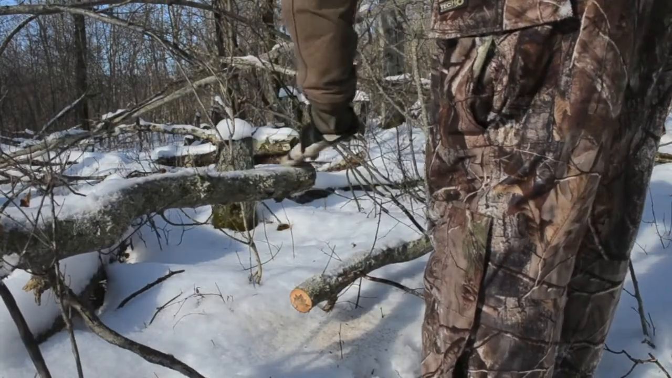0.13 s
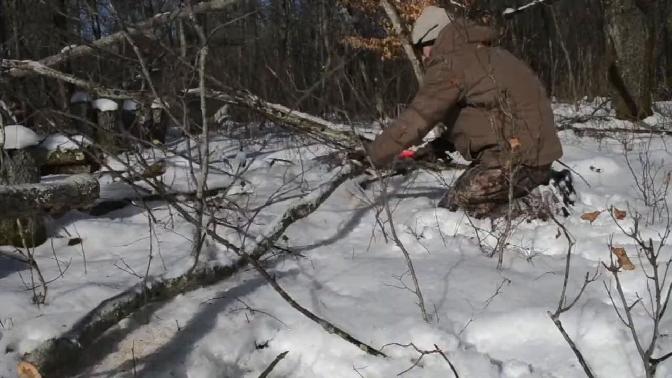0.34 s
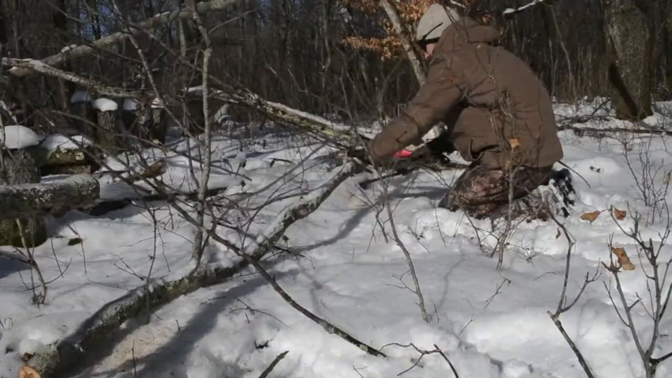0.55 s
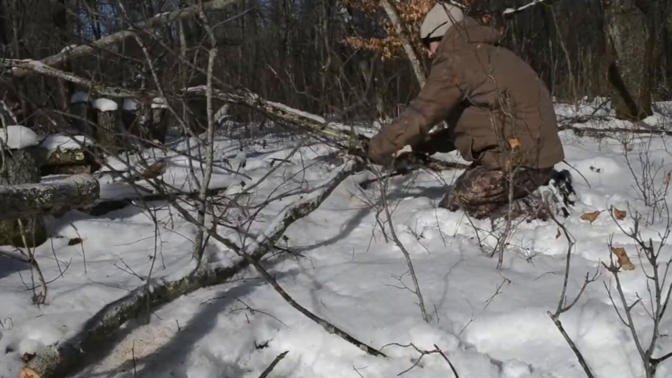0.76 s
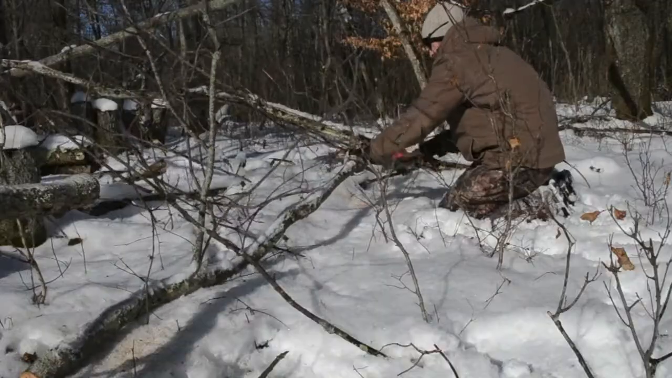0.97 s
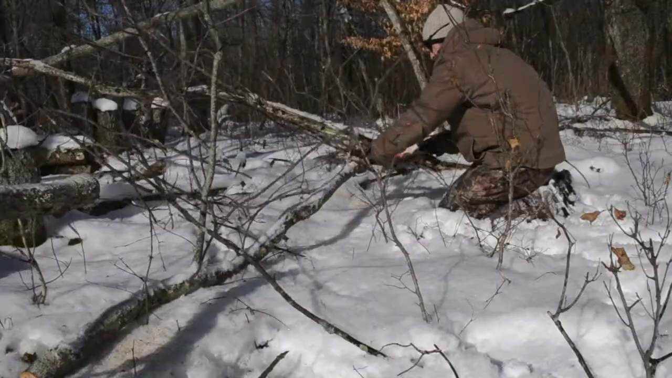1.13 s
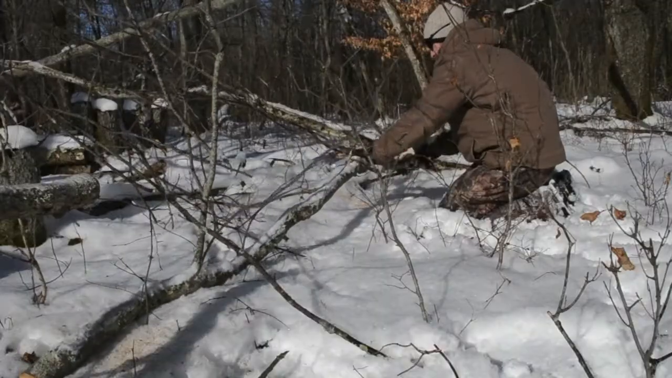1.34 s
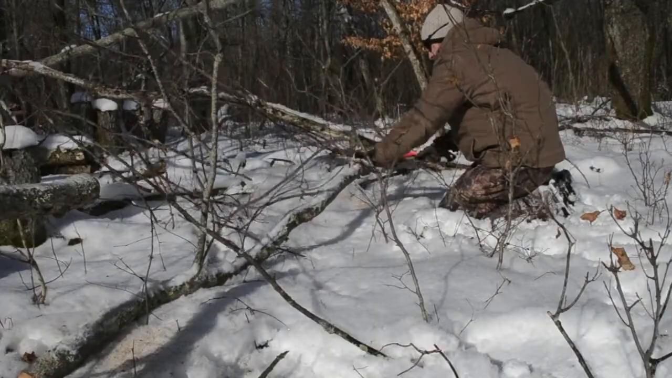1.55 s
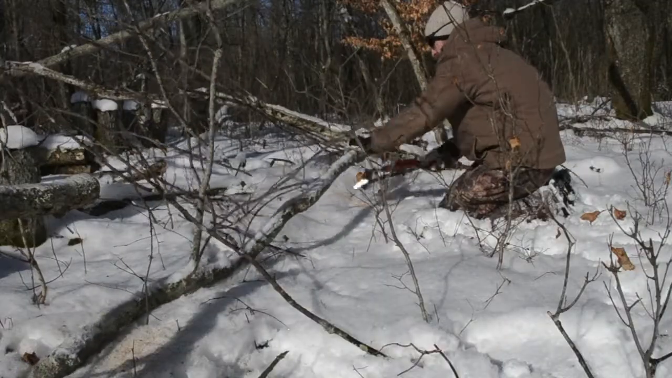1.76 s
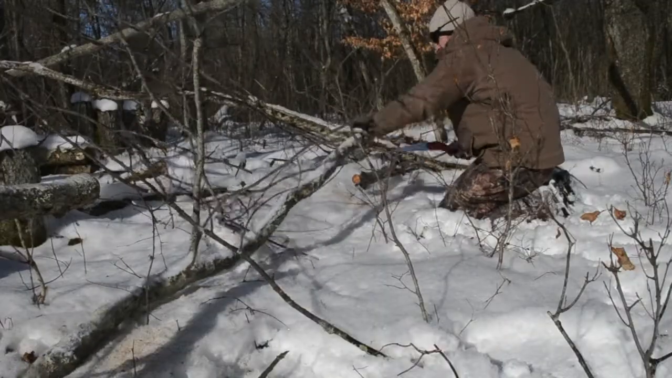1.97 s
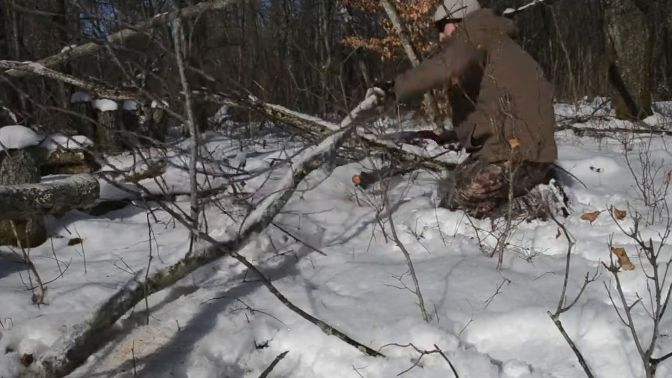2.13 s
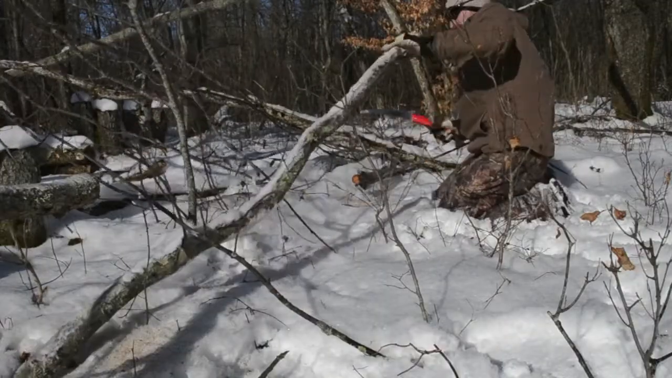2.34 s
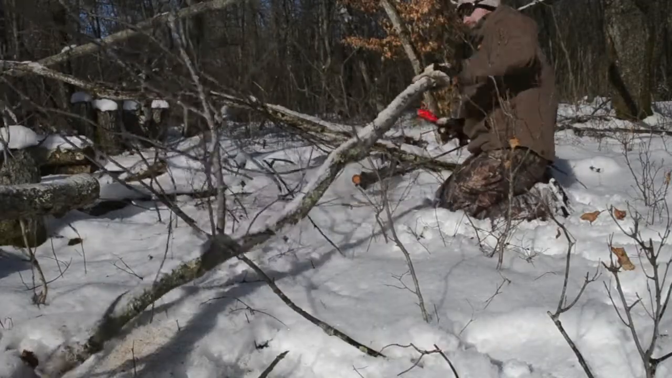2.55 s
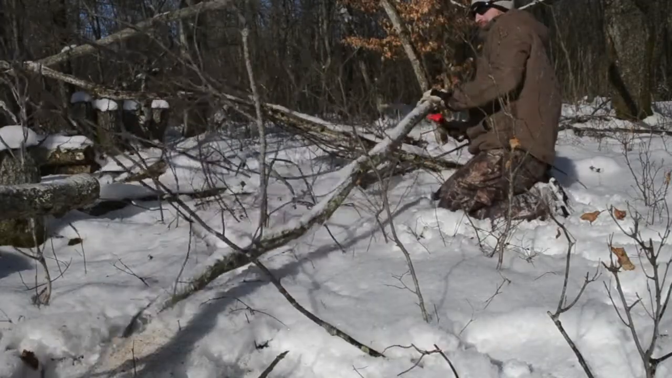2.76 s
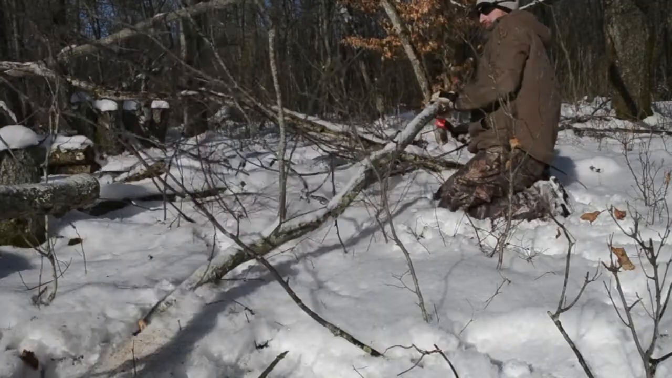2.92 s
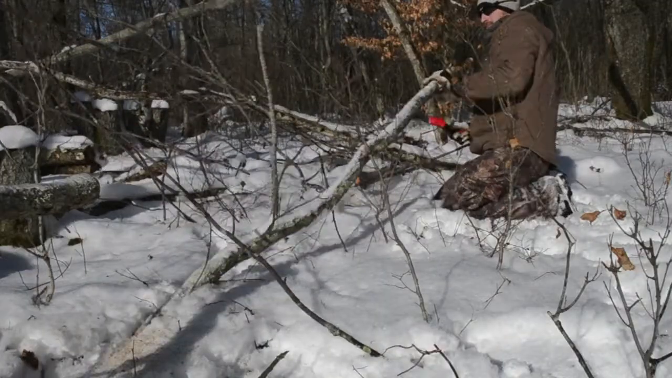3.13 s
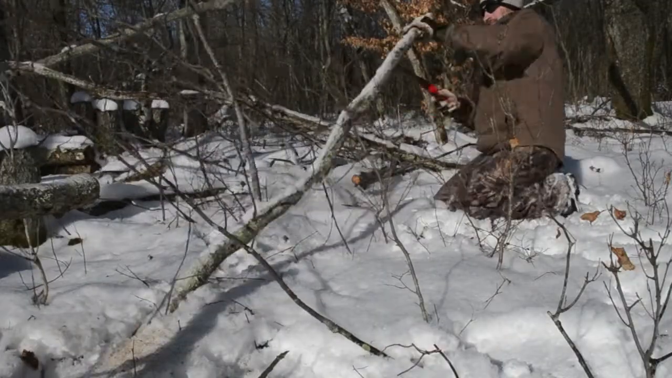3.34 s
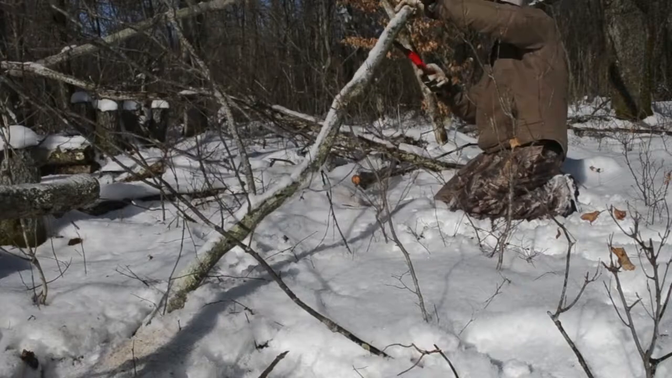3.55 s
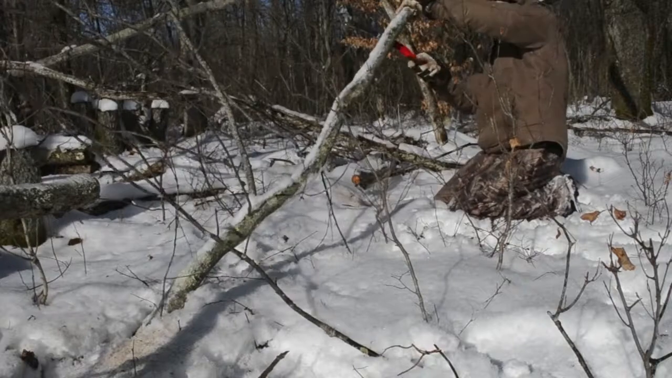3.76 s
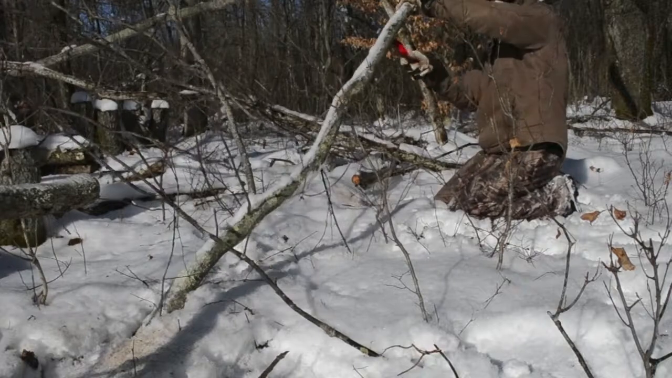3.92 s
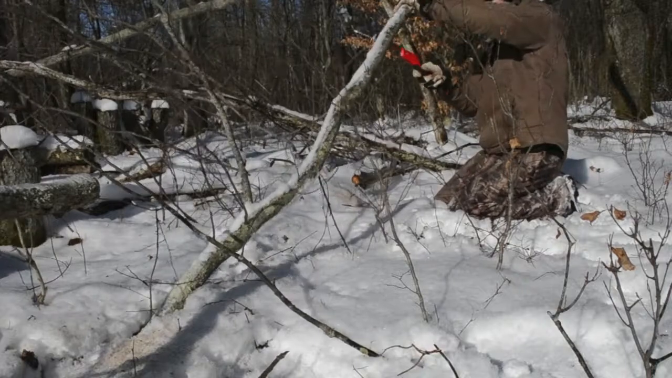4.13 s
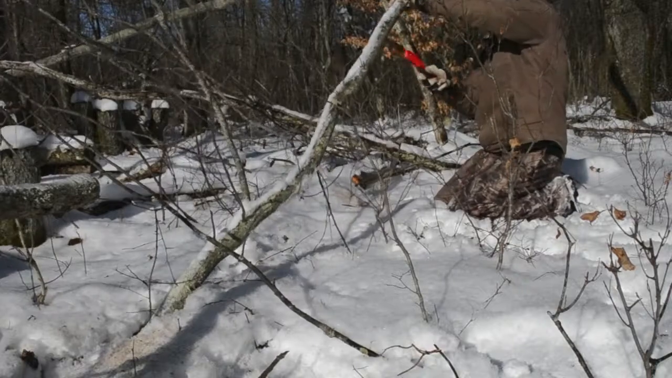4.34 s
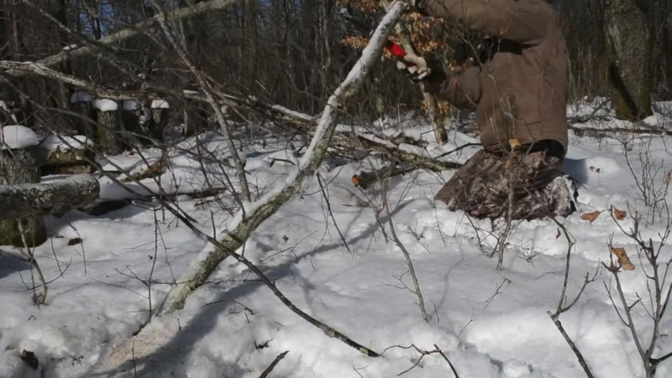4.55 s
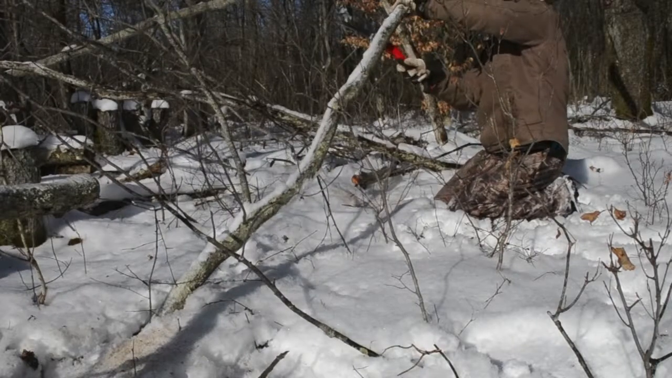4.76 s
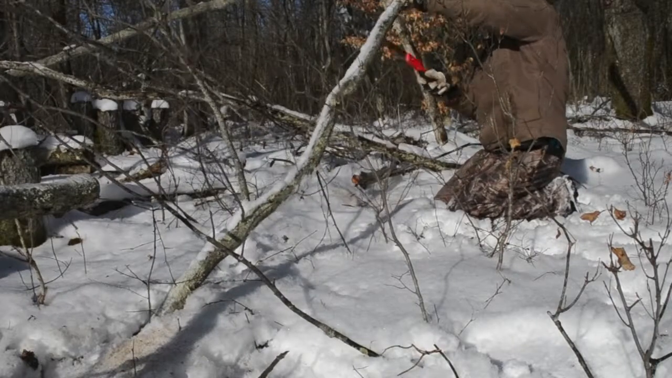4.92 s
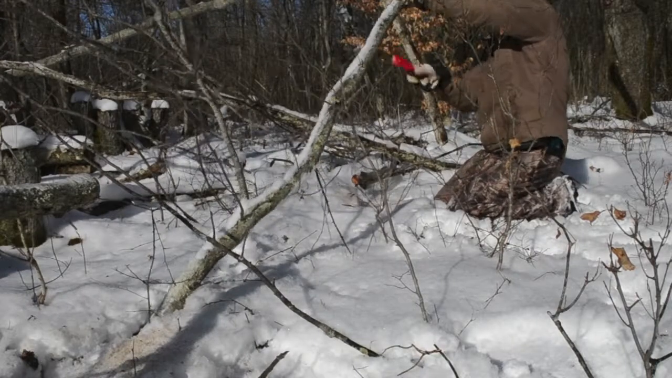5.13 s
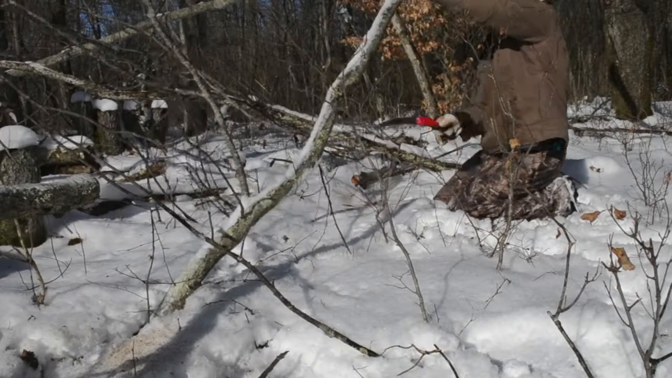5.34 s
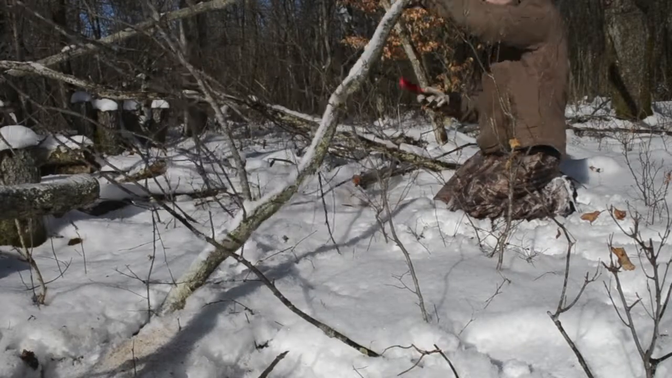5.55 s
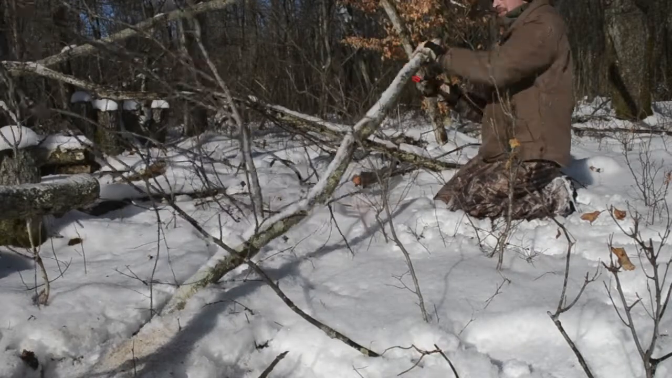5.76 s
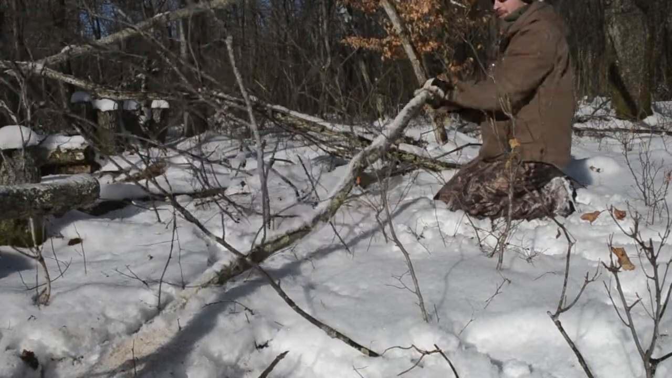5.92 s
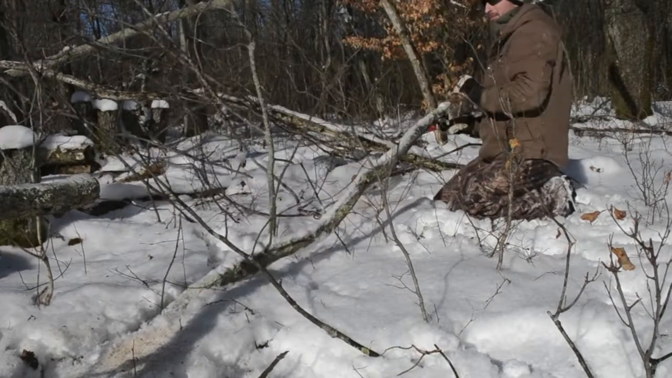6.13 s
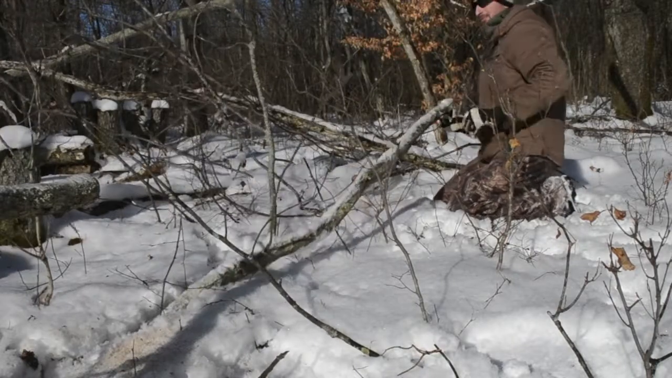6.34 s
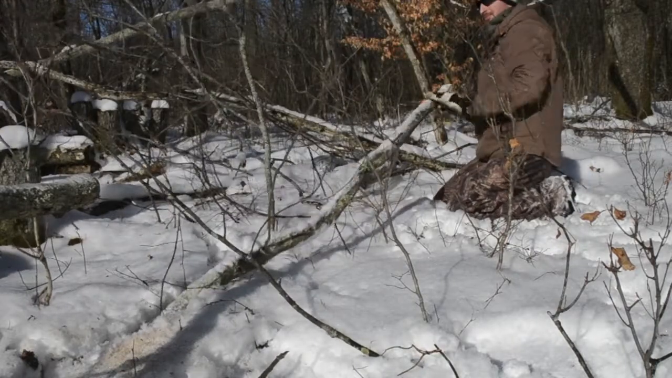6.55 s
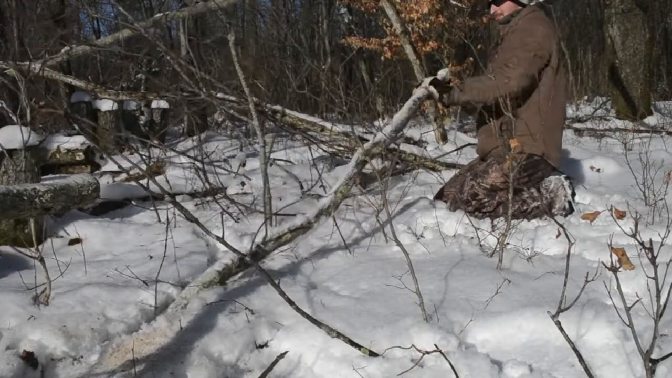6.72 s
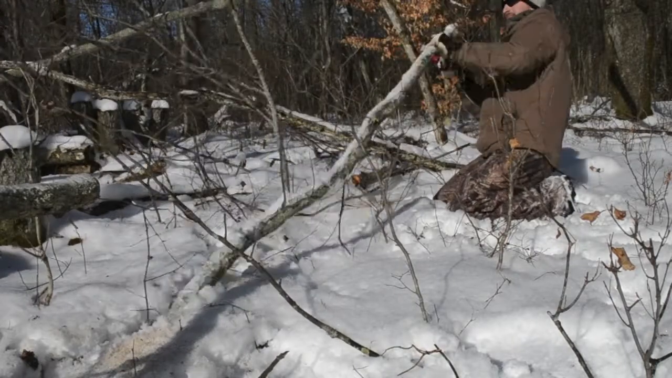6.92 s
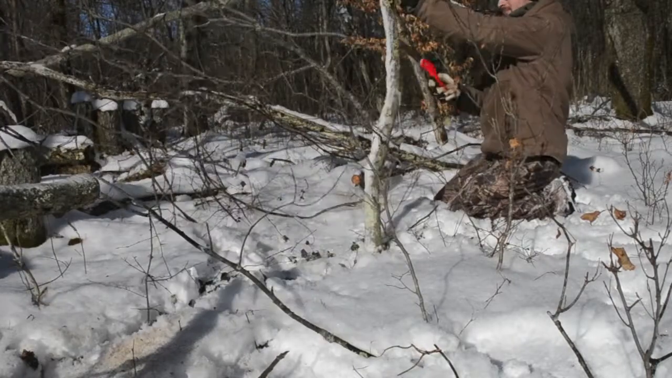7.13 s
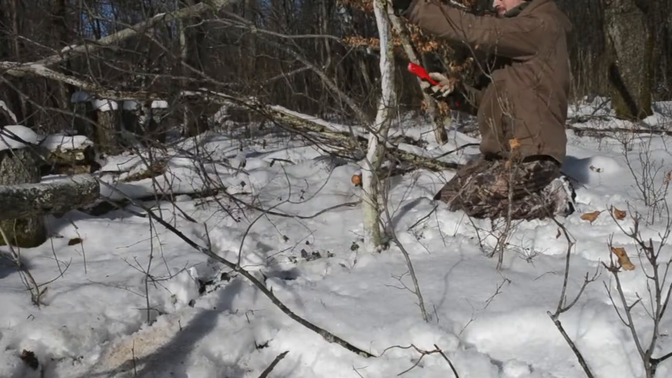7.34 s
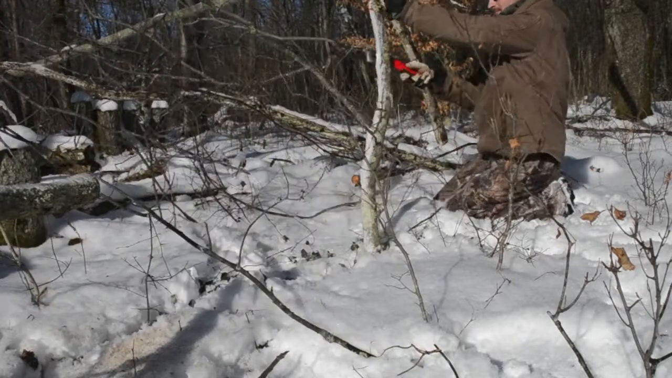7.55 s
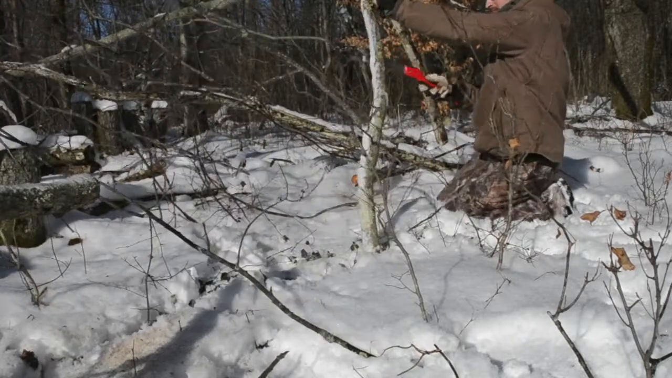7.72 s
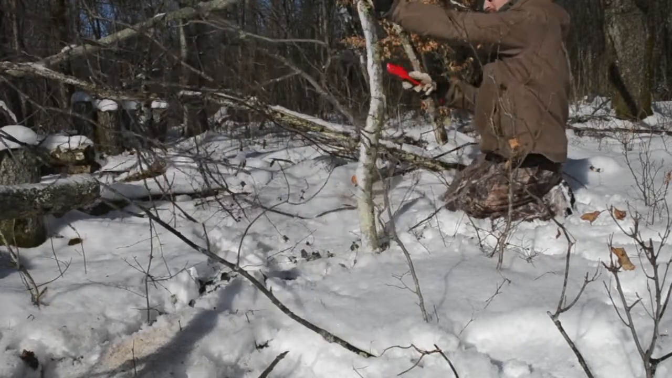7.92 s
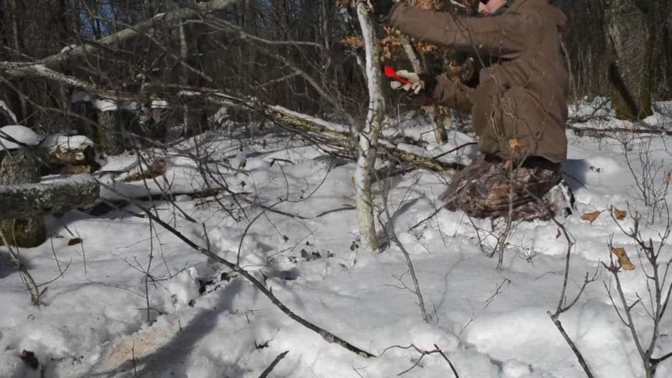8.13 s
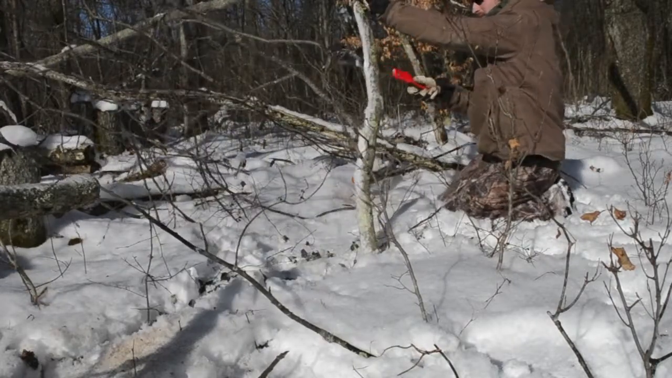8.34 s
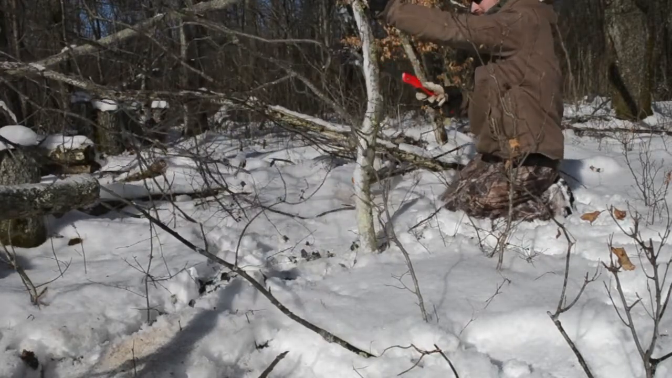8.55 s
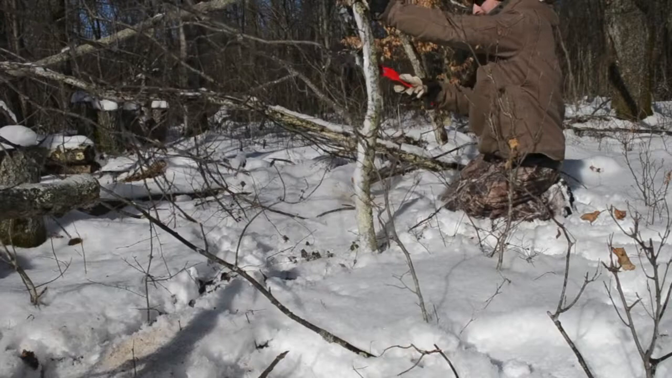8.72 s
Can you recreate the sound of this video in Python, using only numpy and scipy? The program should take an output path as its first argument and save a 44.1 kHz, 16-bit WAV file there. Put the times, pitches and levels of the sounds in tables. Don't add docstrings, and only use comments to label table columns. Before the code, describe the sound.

Fast dry sawing strokes in quiet winter woods, broken by wood cracking and a branch dragged hissing and crunching through snow and twigs.

```python
import sys
import numpy as np
from scipy import signal
from scipy.io import wavfile
from scipy.ndimage import uniform_filter1d

SR = 44100
rng = np.random.default_rng(int(sys.argv[2]) if len(sys.argv) > 2 else 0)


def file_out(sig):
    cols = np.atleast_2d(sig).T
    lim = np.clip(cols, -1, 1)
    pcm = np.round(lim * 32767).astype(np.int16)
    wavfile.write(sys.argv[1], SR, pcm)


def nominal_scale(level):
    x = np.asarray(level, float) / 20
    return 10 ** x


N = 391588
TIME_S = np.arange(N) / SR
COARSE_S = TIME_S[::64]

# (frequency [Hz], density [dB per Hz])
AIR_SPECTRUM = [(15, -55), (25, -19.5), (327, -1), (391, -2.5), (619, -1), (721, 4), (1200, -8.5),
                (2640, -10), (3240, -10), (6120, -35), (7900, -48), (9200, -31), (11000, -42), (14300, -66),
                (22000, -120)]
# (time [s], level [dB])
SNOW_PRESSES = [(0.32, -71), (0.57, -73), (0.731, -63), (1.02, -58.5), (1.39, -64), (1.659, -59),
                (2.65, -67), (3.001, -60), (3.224, -61), (3.56, -72), (4.199, -66), (4.771, -61),
                (5.07, -64), (5.3, -68), (7.05, -75), (7.621, -62)]
# (frequency [Hz], density [dB per Hz])
PRESS_SPECTRUM = [(40, -7), (90, -11.5), (160, -1), (260, -5.5), (400, -65)]
# (peak time [s], rise [s], fall [s], crunch level [dB], hiss over crunch [dB])
SHOVES = [(0.1, 0.22, 0.28, -55, 7.5), (0.35, 0.078, 0.64, -57, -1), (1.7, 0.41, 0.18, -58.5, 2),
          (2.25, 0.38, 0.31, -55, 0), (2.48, 0.16, 1.4, -61, -7), (2.8, 0.59, 0.2, -49, 4.5),
          (2.96, 0.24, 0.044, -58.5, -7), (3.12, 0.023, 0.7, -57, 1.5), (3.4, 0.14, 0.32, -60, 9),
          (3.56, 0.27, 0.043, -58, -17), (3.87, 0.082, 0.047, -63, -1), (4.6, 1.3, 2.1, -57.5, -4),
          (5.22, 0.52, 0.52, -65.5, 10), (5.655, 0.08, 0.28, -62, 5), (5.92, 0.2, 0.15, -58.5, 0),
          (6.02, 0.11, 0.31, -63.5, 6), (6.63, 0.1, 0.095, -57.5, 3.5), (6.94, 0.19, 0.2, -49, -3),
          (7.08, 0.28, 0.11, -54.5, 7.5), (7.23, 0.1, 1.3, -70, 5), (7.46, 0.094, 0.33, -59.5, -6),
          (7.7, 0.062, 1.5, -58.5, 2)]
# (frequency [Hz], density [dB per Hz])
CRUNCH_SPECTRUM = [(88, -27), (150, -14.5), (408, -8.5), (448, -4), (568, 0), (1630, 3), (3500, -6),
                   (4550, -20.5), (7700, -120)]
# (frequency [Hz], density [dB per Hz])
HISS_SPECTRUM = [(1290, -18.5), (2200, -8), (6330, -6), (7860, -9), (9170, -4.5), (10100, -12.5),
                 (11000, -28.5), (14300, -69), (22000, -120)]
# (time [s], peak [dB], centre [Hz])
TWIG_SNAPS = [(1.729, -40, 5470), (1.8017, -42, 4900), (1.8406, -43, 5000), (1.8735, -52, 4940),
              (1.9314, -45, 7500), (1.952, -42.5, 8800), (1.9867, -50, 5110), (2.0032, -45, 4700),
              (2.039, -38.5, 6600), (2.1084, -55, 5130), (2.1093, -36, 8950), (2.204, -49, 4160),
              (2.2214, -28, 5030), (2.2571, -39.5, 3510), (2.3355, -39.5, 4680), (2.3826, -33, 6600),
              (2.4, -30, 7940), (2.4407, -49, 7140), (2.483, -46, 5560), (2.494, -39, 6500),
              (2.5067, -30.5, 3770), (2.707, -34.5, 8200), (2.7464, -36, 4510), (2.7898, -41, 5610),
              (2.819, -33, 6240), (2.9233, -39, 3240), (2.9515, -45, 7400), (2.975, -31.5, 6300),
              (2.9949, -41, 4330), (3.0247, -39, 9030), (3.059, -43, 4730), (3.1037, -40, 9450),
              (3.184, -40, 5400), (3.2863, -36, 3570), (3.3152, -44, 5170), (3.3382, -41, 5320),
              (3.3448, -35, 3830), (3.387, -34.5, 3400), (3.405, -32, 4610), (3.4344, -35, 7220),
              (3.4734, -34, 5810), (3.4748, -30.5, 4180), (3.5497, -38, 5050), (3.5706, -40, 3970),
              (3.628, -51, 5680), (3.6729, -38, 9140), (3.712, -44, 5860), (3.7256, -34.5, 7700),
              (3.767, -41.5, 4900), (3.7976, -54, 3160), (3.867, -47, 8100),
              (5.223, -41, 8860), (5.2417, -42, 4770), (5.269, -30, 6340), (5.3186, -51, 4300),
                   (5.33, -40, 3720), (5.3707, -37.5, 4730), (5.4426, -39, 7640), (5.489, -47, 3990),
                   (5.5027, -40, 5760), (5.5385, -48, 6560), (5.5553, -37.5, 7000), (5.6463, -44, 3000),
                   (5.6476, -36, 6620), (5.7221, -43, 4020), (5.7885, -40, 4000), (5.8254, -43, 7230),
                   (5.8257, -43, 4500), (5.8923, -33, 9100), (5.9396, -43, 5020), (6.0938, -45, 4240),
                   (6.1492, -45, 5250), (6.226, -41, 9400), (6.244, -42, 8400), (6.2629, -39.5, 4300),
                   (6.4231, -46.5, 8900), (6.448, -45, 9000), (6.5053, -45, 4860), (6.5468, -46, 4720),
                   (6.5813, -42, 3820),
              (6.8016, -45, 3030), (6.8351, -44, 4310), (7.1698, -52, 3670), (7.2018, -41, 8770),
                   (7.2636, -45.5, 4340), (7.2901, -53, 4850), (7.337, -44, 3860), (7.3504, -40.5, 5200),
                   (7.4053, -41.5, 7030), (7.4257, -37, 6700), (7.4537, -38, 5000)]
# (time [s], peak [dB], centre
# [Hz])
MORE_SNAPS = [(1.42, -45, 6480), (1.5244, -45, 3480), (1.5549, -41, 4520), (1.7064, -37, 5570),
              (1.8008, -42, 4900), (3.9601, -38, 5730), (4.1244, -42, 8770), (4.2743, -36.5, 5330),
              (4.586, -38, 3200), (7.7667, -34, 9370), (8.1876, -36, 8970)]
# (time [s], peak [dB], centre [Hz])
FIBRE_CATCHES = [(0.2833, -33, 4930), (0.2965, -44, 5640), (0.3132, -44, 3220), (0.5831, -21.5, 3480),
                 (0.7828, -36, 5400), (0.865, -25.5, 3470), (0.92, -38.5, 6700), (1.2025, -28, 3500),
                 (1.2288, -23.5, 3500), (1.2867, -38, 5500), (0.586, -32, 3340), (1.455, -36.5, 4950),
                 (1.6279, -33.5, 4740), (5.115, -39, 5800), (5.1756, -26, 6550), (7.62, -45, 6330),
                 (7.6444, -44, 8920), (7.906, -34, 8360), (7.914, -28.5, 5460), (8.069, -35, 8400),
                 (8.1998, -32, 8900), (8.3499, -49, 8860), (8.633, -34.5, 5500)]
# (time [s], peak [dB], splinter [Hz], stick [Hz], stick over splinter [dB])
CLEAN_BREAKS = [
    (1.671, -23, 3200, 1800, -6),
    (1.694, -15.5, 6000, 3000, -22),
    (3.9143, -23, 5600, 3600, -7),
    (4.2215, -32, 4500, 760, 2),
    (4.5155, -27, 4800, 2200, -4),
    (6.6771, -15, 4700, 1500, -9),
    (6.926, -22, 8500, 1600, -6),
]
# (time [s], peak [dB], main ring [Hz], treble over peak [dB])
WOOD_KNOCKS = [(0.31, -25, 930, -7), (0.382, -41, 920, -1), (0.5804, -18.5, 1020, -17),
               (0.784, -44.5, 1560, 9.5), (0.864, -22, 1260, -11), (1.202, -26, 830, -14),
               (1.228, -27, 880, -15), (1.666, -30, 2560, 4.5), (2.334, -51, 1720, -9),
               (2.506, -34.5, 1610, -1), (2.923, -41, 1810, 3), (3.724, -44, 774, -7),
               (3.797, -49, 1030, -19), (3.85, -39.5, 684, -31), (3.875, -43, 1570, 2),
               (4.447, -34.5, 1000, -21), (4.794, -33, 985, -19), (5.112, -36, 1380, -19),
               (5.162, -37, 1060, -20), (5.927, -41, 1060, -18), (6.464, -46, 1115, -21),
               (6.504, -34.5, 1290, -14), (6.6745, -30.5, 1820, 1), (6.91, -46, 846, 2),
               (6.924, -36, 1570, 8.5), (7.077, -39, 1700, -2), (7.426, -49.5, 966, 5)]
# (time [s], peak [dB], main ring [Hz], treble over peak [dB])
BARK_SCUFFS = [(.185, -40.5, 1700, 1), (1.395, -41.5, 537, -25), (1.655, -33, 450, -27),
               (1.675, -37, 1800, 4), (1.688, -39, 3280, 9), (1.696, -43.5, 2000, 9),
               (6.68, -42.5, 2000, -0.5), (2.249, -45, 1030, -12.5), (2.992, -43.5, 1950, -16),
               (5.291, -46, 870, -17), (5.635, -43, 1890, -18.5), (5.657, -44.5, 840, -20),
               (5.335, -52, 900, -20), (5.475, -55, 700, -20), (5.623, -47, 1020, -15),
               (5.645, -47, 1200, -10), (5.914, -47, 1400, -17), (5.985, -48, 1200, -20),
               (6.015, -49, 1100, -20), (6.563, -54, 1300, -12), (2.516, -38, 1610, -12),
               (6., -45, 650, -15), (6.525, -46, 1130, -20), (6.549, -52, 1160, -28)]
# (frequency [Hz], density [dB per Hz])
KNOCK_SPECTRUM = [(120, -76), (200, -12.5), (985, 4), (1720, 0.5), (2410, 6), (2900, -7), (3490, -2.5),
                  (6000, -20), (7800, -71), (13200, -120)]
# (time [s], low mode [dB], low mode [Hz], contact [s], upper modes [dB])
LIMB_BLOWS = [(0.5813, -24.5, 924, 0.007, -14), (.8636, -27.5, 965, .009, -22),
              (1.2017, -29, 880, 0.0053, -25.5), (1.228, -27.5, 863, 0.0077, -22.5),
              (1.394, -43.5, 548, .012, -58), (4.218, -34, 760, 0.006, -47), (4.442, -36.5, 950, .005, -50),
              (4.449, -31.5, 1000, 0.0075, -40), (4.513, -28.5, 770, 0.0053, -45),
              (5.289, -50, 890, 0.0083, -60), (5.657, -48, 826, 0.008, -61),
              (5.926, -44, 1190, 0.0043, -58), (6.6761, -28.5, 1125, 0.0032, -54)]
# (frequency [Hz], level [dB], t60 [s])
LIMB_MODES = [(1560, -6, 0.026), (1920, -1.5, 0.036), (2100, 3, 0.029), (2340, 4, 0.017), (3200, -5, 0.024),
              (3640, 4.5, 0.015), (4440, -22, 0.018), (4840, -8, .03), (6960, -17, .012)]
# (time [s], peak [dB], mode [Hz], t60 [s])
BLADE_PINGS = [
    (1.625, -43, 4920, 0.083),
    (1.748, -43, 4880, 0.16),
    (2.992, -47, 2030, 0.054),
    (5.177, -40, 6380, 0.11),
    (7.427, -46, 6300, 0.079),
    (7.455, -44, 4920, 0.075),
    (7.455, -53, 5650, 0.17),
    (7.815, -41, 4890, 0.095),
]
# (start [s], length [s], wood level [dB], fastest point [0-1 of stroke])
SAW_RUNS = [
    [(0.28, 0.052, -55, 0.4), (0.355, 0.12, -50, 0.68), (0.488, 0.24, -47, 0.25), (0.653, 0.095, -50, 0.73),
     (0.762, 0.18, -47.5, 0.36), (0.941, 0.14, -53.5, 0.45), (1.095, 0.24, -51.5, 0.37),
     (1.296, 0.11, -54, 0.58), (1.424, 0.13, -50.5, 0.64), (1.574, 0.067, -54, 0.72)],
    [(3.95, 0.18, -46, 0.52), (4.115, 0.13, -48.5, 0.64), (4.257, 0.15, -41.5, 0.59),
     (4.414, 0.11, -46, 0.7), (4.546, 0.14, -43.5, 0.62), (4.697, 0.11, -45.5, 0.77),
     (4.825, 0.14, -38.5, 0.66), (4.977, 0.12, -43.5, 0.66), (5.105, 0.028, -48, 0.75),
     (5.149, 0.0486, -50, 0.67)],
    [(7.62, 0.19, -48.5, 0.35), (7.786, 0.11, -51, .6), (7.901, 0.12, -45, 0.76), (8.05, 0.12, -50, 0.65),
     (8.18, 0.14, -45.5, .55), (8.335, 0.12, -48.5, .56), (8.462, 0.13, -47, .5), (8.605, 0.11, -48, 0.68),
     (8.732, 0.12, -46, 0.6)],
]
# (frequency [Hz], width [Hz], level [dB])
BRANCH_MODES = [
    [[(520, 100, -7), (930, 140, -5.5), (2080, 350, -8)], [(307, 99, 5.5), (460, 65, 4.5), (1060, 31, 2)]],
    [[(842, 21, -6), (1030, 40, -8), (1380, 69, 0.5), (2546, 47, 6)], [(1030, 57, 0), (2270, 49, -22),
     (2578, 59, -5)]],
    [[(450, 32, 1.5), (1060, 46, 7.5), (1850, 200, 3.5), (2380, 380, 4)], [(480, 180, -2), (965, 42, -2.5),
     (1810, 140, -1)]],
]
# (frequency [Hz], width [Hz], level [dB])
BLADE_MODES = [(3420, 260, 5), (4020, 62, 8), (4455, 46, 10.5), (5030, 89, 8), (5724, 38, 9.5),
               (6650, 190, 5), (8400, 740, 2)]
# (frequency [Hz], width [Hz], level [dB])
BLADE_OVERHANG = [
    (5000, 1700, 11),
    (9400, 1200, -13),
    (8660, 1200, 0),
]
# (pull [dB], push [dB])
BLADE_OVER_WOOD = [
    (-0.5, -1.5),
    (-1.2, -2),
    (3.6, 1.7),
]
# (frequency [Hz], density [dB per Hz])
TEAR_SPECTRUM = [(60, -31.5), (150, -29), (350, -12.5), (800, -3.5), (1350, -4), (2000, -7.5),
                 (3200, -14.5), (5000, -30)]
# (frequency [Hz], density [dB per Hz])
RASP_SPECTRUM = [(1200, -45), (2200, -16), (2800, -7), (4200, -8), (5100, -2), (7200, -4), (9300, 1),
                 (10100, -6), (11000, -24), (14000, -68)]
# (time [s], fade out [s], fade in [s])
SCENE_CHANGES = [
    (0.271, 0.055, 0.041),
    (7.149, 0.035, 0.069),
]
# (frequency [Hz], width [Hz], level [dB])
HOUSING_DIP = (7850, 260, -9)


def evened(x):
    return x / np.sqrt(np.mean(x ** 2) + 1e-20)


def peak_at(db, x):
    return nominal_scale(db) * x / abs(x).max()


def add(mix, start_s, sound):
    part = mix[round(start_s * SR):][:len(sound)]
    part += sound[:len(part)]


def colour(x, spectrum, peaks=(), lift_db=0.):
    hz = abs(np.fft.fftfreq(8192, 1 / SR))
    f, db = np.transpose(spectrum)
    power = nominal_scale(2 * np.interp(np.log(hz + 1), np.log(f), db, left=-60, right=-60))
    resonance = sum(nominal_scale(2 * (lift_db + d)) / (1 + (2 * (hz - c) / w) ** 2) for c, w, d in peaks)
    log_gain = np.log(power * (1 + resonance)) / 2
    taps = np.fft.ifft(np.exp(np.conj(signal.hilbert(log_gain)))).real[:4096]
    return signal.oaconvolve(x, taps / np.linalg.norm(taps))[:len(x)]


def grit(per_s, spread_db, puff_s, share):
    size = nominal_scale(spread_db * np.minimum(rng.exponential(1, N), 4))
    size = size * (rng.random(N) < per_s / SR)
    puffs = signal.lfilter([1], [1, -np.exp(-1 / (puff_s * SR))], size)
    return evened((1 - share + share * evened(puffs)) * rng.standard_normal(N))


def ring(hz, t60_s, size=5000):
    t = np.arange(size) / SR
    return np.sin(2 * np.pi * hz * t) * nominal_scale(-60 * t / t60_s)


def patchy(x, depth_db, bins, frames):
    z = signal.stft(x, nperseg=512, noverlap=384)[2]
    field = rng.standard_normal(z.shape[::-1]).T
    field = uniform_filter1d(field, bins, axis=0)
    field = evened(uniform_filter1d(field, frames, axis=1))
    return signal.istft(z * nominal_scale(depth_db * field), nperseg=512, noverlap=384)[1][:N]


def hump(peak_s, rise_s, fall_s, db):
    drop_db = -14
    away = np.maximum((peak_s - COARSE_S) / rise_s, (COARSE_S - peak_s) / fall_s)
    return nominal_scale(2 * (db + drop_db * away))


def stroke_arc(length_s, fastest):
    usual_s, usual_exponent, exponent_per_s = 0.13, 0.67, 31
    size = round(length_s * SR)
    u = np.arange(size) / size
    speed = np.sin(np.pi * u ** (np.log(.5) / np.log(np.clip(fastest, .1, .9))))
    return speed, max(usual_exponent + exponent_per_s * (length_s - usual_s), .4)


def blade_speed():
    speed = np.zeros(N)
    for start_s, length_s, _, fastest in sum(SAW_RUNS, []):
        add(speed, start_s, stroke_arc(length_s, fastest)[0])
    return speed


def woods_air():
    hum = [(445, 26, 11), (410, 20, 6), (381, 20, 11)]  # (frequency [Hz], width [Hz], level [dB])
    air = colour(rng.standard_normal(N), AIR_SPECTRUM, hum)
    return nominal_scale(-66) * patchy(air, 2.2, bins=2, frames=60)


def tree_echoes(x):
    taps = rng.standard_normal(6000) * nominal_scale(-60 * TIME_S[:6000] / .13)
    taps[:300] = 0
    dull = signal.lfilter([.6], [1, -.4], taps / np.linalg.norm(taps))
    return nominal_scale(-19) * signal.oaconvolve(x, dull)[:N]


def snow_presses():
    shake_db, ground_db = -73.5, -82.5
    thud_hz, thud_t60_s, thud_over_db = 150, 0.055, 3
    lumps = colour(grit(6.5, spread_db=-1.0, puff_s=0.019, share=0.12), PRESS_SPECTRUM)
    pressed = nominal_scale(2 * ground_db) + sum(hump(s, 0.02, 0.04, db) for s, db in SNOW_PRESSES)
    rocked = (nominal_scale(shake_db) * blade_speed()) ** 2
    out = np.sqrt(np.interp(TIME_S, COARSE_S, pressed) + rocked) * lumps
    thud = ring(thud_hz, thud_t60_s) * np.minimum(TIME_S[:5000] * thud_hz, 1)
    for s, db in SNOW_PRESSES:
        add(out, s, nominal_scale(db + thud_over_db) * thud)
    return out


def shove_gains():
    rest = nominal_scale(2 * -90)
    crunch = rest + sum(hump(s, rise, fall, db) for s, rise, fall, db, _ in SHOVES)
    hiss = rest + sum(hump(s, rise, fall, db + over_db) for s, rise, fall, db, over_db in SHOVES)
    return [np.interp(TIME_S, COARSE_S, np.sqrt(power)) for power in (crunch, hiss)]


def branch_drag():
    crunch_gain, hiss_gain = shove_gains()
    grains = grit(300, spread_db=1.5, puff_s=0.0015, share=0.11)
    ticks = grit(110, spread_db=2.2, puff_s=.0006, share=.45)
    crunch = crunch_gain * colour(grains, CRUNCH_SPECTRUM)
    hiss = hiss_gain * colour(.8 * grains + .6 * ticks, HISS_SPECTRUM)
    return patchy(crunch + hiss, 1.8, bins=30, frames=4)


def snaps():
    catch_tail_s, twig_tail_s = 0.0045, 0.0018
    twigs = TWIG_SNAPS + MORE_SNAPS
    breaks = [(*c, catch_tail_s) for c in FIBRE_CATCHES] + [(*c, twig_tail_s) for c in twigs]
    out, t = np.zeros(N), np.arange(600) / SR
    for s, db, hz, tail_s in breaks:
        burst = rng.standard_normal(600) * np.exp(-t / tail_s)
        splinter = colour(burst, HISS_SPECTRUM, [(hz, 1800, 0)], lift_db=4.0)
        click = ring(hz, 0.0066, size=600) + peak_at(0, 2.16 * splinter) * 2.16
        add(out, s, peak_at(db, click))
    return out


def cracks():
    out = np.zeros(N)
    for s, db, splinter_hz, stick_hz, stick_db in CLEAN_BREAKS:
        splinter = ring(splinter_hz, .0017, size=800)
        stick = nominal_scale(stick_db) * ring(stick_hz, .007, size=800)
        add(out, s, -peak_at(db, splinter + stick))
    return out


def knocks():
    knock_s, hard_knock_s, scuff_s, hard_db = 0.0052, 0.0072, 0.012, -26
    hits = [(*k, hard_knock_s if k[1] > hard_db else knock_s) for k in WOOD_KNOCKS]
    hits += [(*k, scuff_s) for k in BARK_SCUFFS]
    out, t = np.zeros(N), np.arange(2600) / SR
    for s, db, hz, treble_db, contact_s in hits:
        noise = rng.standard_normal(2600)
        shape = np.minimum(t / (0.26 * contact_s), 1) * np.exp(-(t / contact_s) ** 2)
        after = nominal_scale(-25.5) * np.minimum(t / contact_s, 1) * np.exp(-(t / 0.025) ** 2)
        lift_db = -1.5 + 0.98 * max(-19.0 - db, 0)
        thud = colour(noise * (shape + after), KNOCK_SPECTRUM, [(hz, 220, 0)], lift_db)
        crack = colour(noise * shape, HISS_SPECTRUM)
        add(out, s, peak_at(db, thud))
        add(out, s, peak_at(db + treble_db, crack))
    return out


def blows():
    slap_s, slap_db = 0.014, -20
    modes = sum(nominal_scale(db) * ring(hz, t60_s, size=1500) for hz, db, t60_s in LIMB_MODES)
    out, rattle_t = np.zeros(N), TIME_S[:300]
    for s, low_db, hz, contact_s, upper_db in LIMB_BLOWS:
        noise = rng.standard_normal(300)
        t = np.arange(0, contact_s, 1 / SR)
        add(out, s, nominal_scale(low_db) * np.sin(np.pi * t / contact_s) * np.sin(2 * np.pi * hz * t))
        rattle = noise * rattle_t * np.exp(-rattle_t / 0.0013)
        upper = peak_at(upper_db, np.convolve(rattle, modes))
        add(out, s, upper)
        add(out, s + slap_s, nominal_scale(slap_db) * np.convolve(upper, noise / np.linalg.norm(noise)))
    return out


def pings():
    out, t = np.zeros(N), TIME_S[:5000]
    for s, db, hz, t60_s in BLADE_PINGS:
        flutter = 1 + .2 * evened(uniform_filter1d(rng.standard_normal(5000), 150))
        swell = 1 - np.exp(-(t / 0.0086) ** 2)
        stop = np.exp(-(3 * t / t60_s) ** 4)
        add(out, s, nominal_scale(db) * flutter * ring(hz, t60_s) * swell * stop)
    return out


def regripped(modes):
    pitch_shift, spread_db, damping = .03, 2.5, 1.7
    move = rng.uniform(-1.03, 1, (len(modes), 2))
    return [(hz * (1 + pitch_shift * a), damping * width, db + spread_db * b)
            for (hz, width, db), (a, b) in zip(modes, move)]


def saw():
    teeth_per_s, tooth_depth = 290, 0.12
    grip, grip_speed = 0.13, 0.19
    speed, out = blade_speed(), np.zeros(N)
    teeth = 1 + tooth_depth * np.cos(2 * np.pi * np.cumsum(teeth_per_s * speed) / SR)
    bites = teeth * grit(400 + 600 * speed, spread_db=1.6, puff_s=.0006, share=.36)
    for k, run in enumerate(SAW_RUNS):
        for n, (s, length_s, wood_db, fastest) in enumerate(run):
            push = n % 2
            stroke, exponent = stroke_arc(length_s, fastest)
            engaged = np.clip((stroke - grip_speed) * 10, 0, 1)
            force = (1 - grip) * stroke ** exponent + grip * engaged
            bite = bites[round(s * SR):][:len(stroke)]
            bite = np.pad(bite * force[:len(bite)], (0, 2000))
            wood = colour(bite, TEAR_SPECTRUM, regripped(BRANCH_MODES[k][push]), lift_db=7.0)
            steel = colour(bite, RASP_SPECTRUM, [*regripped(BLADE_MODES), BLADE_OVERHANG[k]])
            add(out, s, nominal_scale(wood_db) * wood)
            add(out, s, nominal_scale(wood_db + BLADE_OVER_WOOD[k][push]) * steel)
    return patchy(out, 2.6, bins=2, frames=12)


def scene():
    high_650_hz = signal.butter(4, 650, "high", fs=SR, output="sos")
    sharp = signal.sosfilt(high_650_hz, cracks() + snaps() + pings())
    blunt = signal.lfilter(*signal.butter(2, 290, "high", fs=SR), knocks() + blows())
    near = saw() + sharp + blunt
    return (near + tree_echoes(near) + branch_drag() + snow_presses() + woods_air())[None]


def top_cut(x):
    return signal.sosfilt(signal.butter(12, 11300, fs=SR, output="sos"), x)


def record(dry):
    hz, width_hz, dip_db = HOUSING_DIP
    b, a = signal.iirnotch(hz, hz / width_hz, SR)
    wet = nominal_scale(dip_db) * dry + (1 - nominal_scale(dip_db)) * signal.lfilter(b, a, dry)
    band_limit = signal.firwin(255, 10995, window=("kaiser", 8), fs=SR)
    wet = signal.oaconvolve(wet, band_limit[None], "same")
    for s, fall_s, rise_s in SCENE_CHANGES:
        fade = np.interp(TIME_S, [s - fall_s, s - .003, s + 0.0034, s + rise_s], [1, 0, 0, 1])
        wet = wet * fade ** 1.19
    return top_cut(wet)


dry = scene()
out = record(dry)
file_out(out)
```